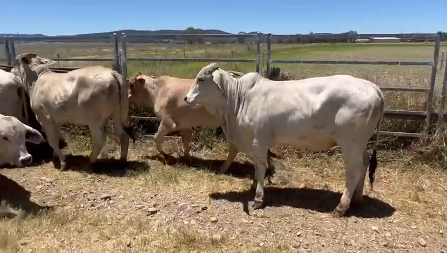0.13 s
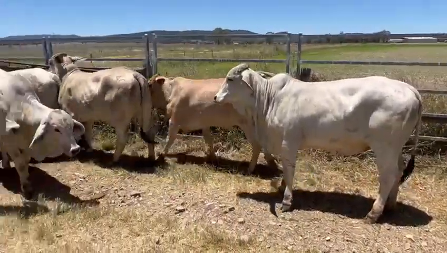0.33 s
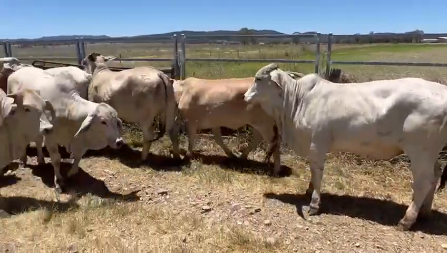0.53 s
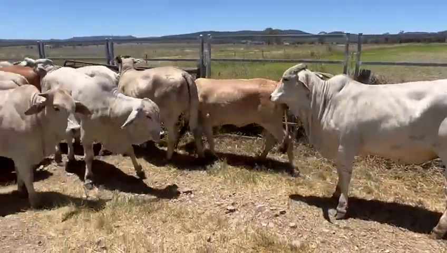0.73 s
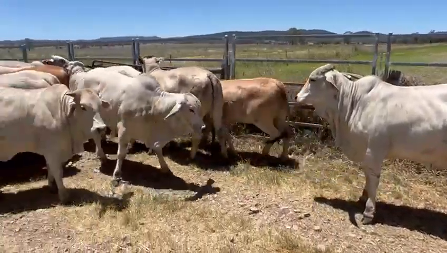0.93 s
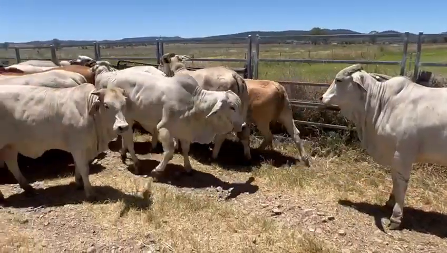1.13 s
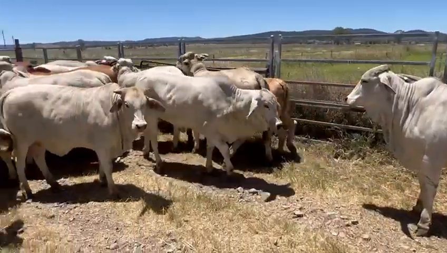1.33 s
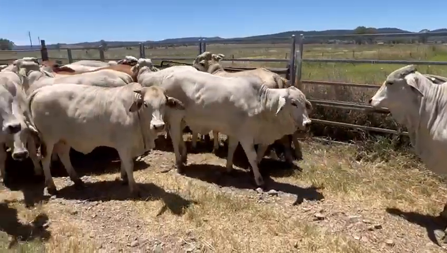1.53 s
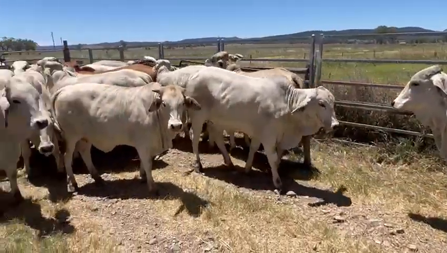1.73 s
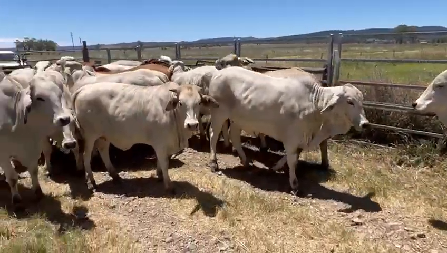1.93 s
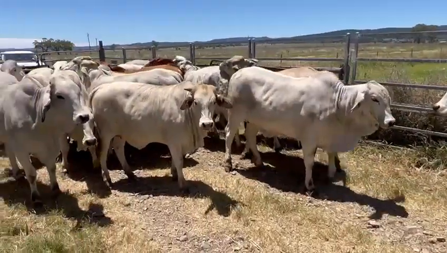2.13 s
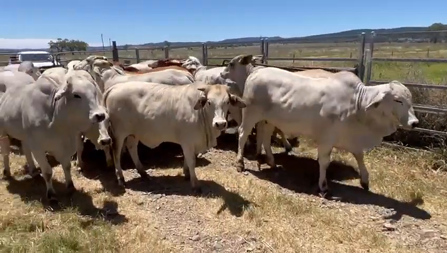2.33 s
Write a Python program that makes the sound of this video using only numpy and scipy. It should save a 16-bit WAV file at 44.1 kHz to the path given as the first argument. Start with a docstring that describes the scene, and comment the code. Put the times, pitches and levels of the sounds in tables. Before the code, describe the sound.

Hooves of a milling herd: heavy dull thuds and gritty scrapes under bassy microphone gusts, then clearer crunching, hollow stone knocks and dry straw rustle, outdoors with almost no reverberation and a faint open-air murmur.

```python
"""A dry dirt yard where cattle mill about. Hooves thud as short sagging tones, scuff as swells of grit grains,
knock on stones as ringing modes or dull narrow bursts, and snap dry stalks as narrow bursts of noise. Trampled
straw rustles faintly, then swells in the second half, as a dense crackle of tiny fractures over a faint open-
air murmur. Low thumps, most likely gusts on the microphone, are swells of bass noise: heavy at first, then
sinking to a soft rumble."""
import sys
import numpy as np
from scipy import signal
from scipy.io import wavfile
from scipy.ndimage import uniform_filter1d

SR = 44100
rng = np.random.default_rng(int(sys.argv[2]) if len(sys.argv) > 2 else 0)


def master(y):
    """Save y as 16-bit WAV."""
    cut = np.clip(np.atleast_2d(y).T, -1, 1)
    pcm = np.round(cut * 32767)  # scale
    wavfile.write(sys.argv[1], SR, pcm.astype(np.int16))


N = 109456
TIME = np.arange(N) / SR
EDGES = 22 * 2 ** (np.arange(24) * .4)  # band edges in Hz, 0.4 octave apart

# murmur of the far herd and fields: (frequency [Hz], density [dB per Hz])
FAR_COLOUR = [(40, -2), (250, -0.5), (900, -9), (4000, -17.5), (8000, -22)]
FAR_DB = -58.5

# left-right likeness of the ground sounds, then of the wind: (frequency [Hz], correlation [-1 to 1])
LIKENESS = [(130, 0.5), (270, 0.2), (600, 0.26), (900, -0.41), (1350, -0.65), (2100, -0.18), (2800, -0.83),
            (4000, 0.62), (9000, -0.71)]
WIND_LIKENESS = [(60, 0.55), (270, 0.25), (800, -0.47)]

# low thumps of moving air: (peak time [s], level [dB], half-length [s], tilt [dB per octave])
BUFFETS = [(0.037, -38, 0.024, 5.5), (0.053, -29, 0.009, -1), (0.09, -29.5, 0.016, 0),
           (0.155, -31, 0.0096, 3), (0.193, -30, 0.017, 1), (0.238, -39, 0.015, 5), (0.289, -27.5, .014, 1),
           (0.325, -28, 0.018, 1), (0.371, -33, .016, -7), (0.398, -33, .012, 1.5),
           (.458, -30.5, 0.024, 2.5), (0.478, -26.5, 0.011, 3), (0.501, -32, 0.013, 4),
           (0.531, -29.5, 0.0059, 3.5), (0.564, -26.5, 0.017, -1), (0.608, -34, 0.027, -1.5),
           (1.743, -45, .02, 0), (1.819, -42, 0.032, -0.5), (1.992, -48, 0.069, 4), (2.123, -44, 0.014, -5),
           (2.273, -42, 0.011, -6.5)]
# soft rumble under the thumps: (time [s], level [dB])
BREEZE = [(0, -35), (.125, -44), (.34, -40), (.6, -44), (.72, -40.5), (.82, -47.5), (1.05, -45),
          (1.28, -50.5), (1.39, -57), (1.52, -55), (1.57, -47.5), (1.66, -59), (1.8, -47.5), (2.22, -58),
          (2.48, -45.5)]
# colour of the thumps, then of the rumble: (frequency [Hz], density [dB per Hz])
BUFFET_COLOUR = [(25, -26), (45, 4), (70, 8.5), (115, -2), (170, -1.5), (300, -4.5), (480, -11),
                 (800, -30.5), (1500, -48), (3000, -54)]
BREEZE_COLOUR = [(25, -3.5), (45, -1.5), (70, 7), (115, -3), (300, -16), (1500, -30.5)]
WIND_PAN_DB = -0.2  # left against right, as in every pan
WIND_STEADY_S = 0.0285  # levelling window, lengthened by one cycle of each band

# trampled straw: (time [s], level [dB])
STRAW = [(0, -62), (.6, -66.5), (.8, -63), (1.18, -60), (1.28, -51), (1.37, -56.5), (1.45, -49.5),
         (1.69, -51.5), (1.75, -47.5), (1.82, -51), (2.12, -55.5), (2.2, -55), (2.48, -59)]
# colour of the straw: (frequency [Hz], density [dB per Hz])
STRAW_COLOUR = [(1500, -21), (2800, 13), (4200, 10.5), (6000, 14.5), (8500, 16), (10500, -31)]
STALKS_PER_S, STALK_SPREAD_DB = 4500, 0.2
STRAW_PAN_DB, STRAW_PATCHY_DB = 5.5, 3
LOOSE_STONES_DB = -12.5  # gain of stones nudged all over the yard, under the straw's level curve
CLUMP_DB, CLUMPS_PER_S = 2, 140  # grit and straw give way in short fits

# stalks snapping and hooves knocking on stones (the dull ones near 1 kHz): (time [s], level [dB], pitch [Hz])
CRACKS = [(0.186, -41, 6630), (.348, -42.5, 6560), (0.388, -44.5, 6670), (.474, -26, 977), (.528, -32, 960),
          (.553, -49.5, 7200), (0.625, -44.5, 5430), (.657, -35, 2190), (0.68, -46, 6000),
          (.681, -42, 1990), (.686, -42, 6540), (.698, -44, 2630), (0.854, -39, 5020), (1.069, -46, 7200),
          (1.083, -43.5, 7500), (1.231, -45, 3130), (1.276, -45.5, 5600), (1.424, -39, 6800),
          (1.450, -31.5, 2300), (1.455, -35, 2100), (1.465, -30, 3110), (1.714, -38, 7800),
          (1.715, -36, 2740), (1.729, -35.5, 8000), (1.883, -46, 6960), (1.973, -39.5, 7500),
          (1.995, -46.5, 3800), (2.045, -33, 930), (2.193, -43.5, 4220), (2.251, -54, 2800),
          (2.26, -46, 5070), (2.26, -42.5, 1800), (2.27, -43, 5500), (2.353, -51, 3730)]
CRACK_DECAY_S = 0.00078  # time to the peak, and the decay constant after it
CRACK_WIDTH_OCT, CRACK_SKIRT_DB = 0.22, -11.5  # reach to each side of the pitch; wider noise around it
CRACK_TAIL_S, CRACK_TAIL_DB, TAIL_CLICKS_PER_S = 0.022, -14.5, 600
CRACK_PAN_DB_PER_OCT, CRACK_CENTRE_HZ = 0.5, 2090  # bright stalks to the left, dull stones to the right

# hooves dragged through grit: (peak time [s], level [dB], fall [s], tilt [dB per octave])
SCUFFS = [(.08, -53, 0.025, 1), (.227, -46, 0.023, 0), (.30, -46, .035, -1), (.384, -54.5, 0.0096, 8.5),
          (.497, -44, 0.0084, -1.5), (.558, -48, .011, -0.5), (0.689, -46, 0.024, 0.5),
          (0.855, -45.5, 0.011, 0.5), (.919, -50, 0.039, 1), (1.079, -46, 0.024, -1),
          (1.115, -46, 0.018, -3.5), (1.228, -47.5, 0.035, 0), (1.27, -42, 0.02, -2.5),
          (1.297, -49, 0.011, -6.5), (1.427, -42, 0.0047, 3), (1.454, -38.5, 0.0087, -0.5),
          (1.469, -42.5, 0.013, -3.5), (1.51, -49, 0.012, -2), (1.587, -44, 0.031, -2.5),
          (1.747, -41, 0.0049, -3.5), (1.86, -51.5, 0.11, -1), (1.97, -63.5, 0.059, -10),
          (2.05, -54, 0.057, -8.5), (2.194, -44, .016, -1), (2.27, -43, 0.0094, -1),
          (2.38, -55.5, 0.13, -2.5)]
# colour of the grit: (frequency [Hz], density [dB per Hz])
GRIT_COLOUR = [(150, -7), (400, -10), (750, 3), (1250, 4), (1600, 1.5), (2100, 2), (3000, -5.5), (4200, -9),
               (6000, -7), (9000, -23), (10500, -48)]
SCUFF_RISE_SHARE = 1.21  # rise time against the fall
GRIT_PER_S, GRIT_SPREAD_DB = 2500, 0.5
GRIT_PAN_DB, GRIT_PATCHY_DB = -0.5, 4.5
PEBBLES_PER_S, PEBBLE_SPREAD_DB = 900, 9
PEBBLE_DB, PEBBLE_CYCLES = -10.5, 14  # gain inside a scuff; cycles to fall by 60 dB
PEBBLE_LOW_HZ, PEBBLE_HIGH_HZ = 694, 3600

# hooves clacking on loose stones: (time [s], level [dB], tilt [dB per octave])
KNOCKS = [(1.077, -36.5, -4), (1.212, -37.5, 1), (1.231, -33, 2), (1.263, -34, -1), (1.288, -37, -16.5),
          (1.426, -31, 1.5), (1.446, -34, 6.5), (1.465, -29.5, 7), (1.556, -45.5, -17), (1.579, -36, -6),
          (1.588, -40, -3), (2.191, -40, 0)]
# ring of hoof on stone, before the small change of pitch per knock: (frequency [Hz], level [dB], t60 [s])
KNOCK_MODES = [(760, -3, 0.037), (1200, -2, 0.057), (2100, -6, 0.061), (3120, -8.5, 0.038)]
KNOCK_CHATTER_S, KNOCK_CHATTER_PER_S, KNOCK_CHATTER_DB = 0.01, 760, -12.5
KNOCK_PAN_DB, KNOCK_ALIKE = -1.5, -0.5  # pan; left-right correlation
KNOCK_PITCH_SPREAD = .012  # no two stones ring quite alike

# dull thuds on packed earth: (start [s], peak level [dB], pitch at the peak [Hz], time to the peak [cycles])
THUDS = [(0.092, -16.5, 99, .35), (0.163, -29, 84, .6), (.288, -18.5, 114, 1.16), (0.484, -15.5, 116, 0.29),
         (.554, -28, 230, 1.54), (.712, -24, 125, 0.28), (.734, -27.5, 129, 0.25), (1.297, -39, 385, 1.84),
         (1.811, -32.5, 149, 0.62), (1.833, -32, 204, 0.61), (1.893, -30.5, 183, 1.23),
         (2.043, -33, 322, 0.92)]
THUD_SAG = 0.17  # final drop below the peak's pitch, as a share of it
THUD_SPREAD_RAD = 0.16  # phase shift of each ear, in opposite directions

ECHO_S, ECHO_DB = .00238, -19  # reflection from a surface just behind the microphone
RUSTLE_TOP_HZ, CUTOFF_HZ, BASS_CUT_HZ = 9900, 12200, 42.4


def from_db(db):
    """Decibels to gain."""
    return 10 ** (np.asarray(db) / 20)


def at_hz(points, hz):
    """Read a spectrum on a log-frequency axis."""
    f, value = np.transpose(points)
    return np.interp(np.log(hz), np.log(f), value)


def level_curve(rows):
    """Gain through time from rows of time and dB."""
    return from_db(np.interp(TIME, *np.transpose(rows)))


def rms_one(x):
    """Scale to rms 1."""
    return x / np.sqrt(np.mean(x ** 2) + 1e-20)


def band_pass(x, edges):
    """Keep the band between two edges in Hz."""
    return signal.sosfilt(signal.butter(2, edges, "band", fs=SR, output="sos"), x)


def pan(db):
    """Left and right gains for a level difference."""
    gains = from_db(np.array([[db], [-db]]) / 2)
    return rms_one(gains)


def stereo(pair, alike):
    """Mix two unrelated signals into left and right with a given correlation."""
    alike = np.clip(alike, -.95, .95)
    middle = np.sqrt(1 + alike) * pair[0]
    side = np.sqrt(1 - alike) * pair[1]
    return middle + side * np.array([[1], [-1]])


def add_at(out, s, sound):
    """Lay a short stereo sound into the mix at a time in seconds."""
    start = int(s * SR)
    out[:, start:start + sound.shape[1]] += sound


def bands(colour, likeness, source, steady_s=None):
    """Yield (Hz, stereo band) of a source; the colour only shares out one fixed total power."""
    centres = np.sqrt(EDGES[1:] * EDGES[:-1])
    inside = (EDGES[1:] > colour[0][0]) & (EDGES[:-1] < colour[-1][0])
    gains = from_db(at_hz(colour, centres)) * np.sqrt(np.diff(EDGES)) * inside
    gains = gains / np.linalg.norm(gains)
    for low, high, hz, gain in zip(EDGES, EDGES[1:], centres, gains):
        drive = source()
        if gain > 0:
            pair = band_pass(drive, [low, high])
            if steady_s:  # even out the random swells of the noise
                window = int((steady_s + 1 / hz) * SR)
                pair = pair / np.sqrt(uniform_filter1d(pair ** 2, window) + 1e-12)
            yield hz, gain * stereo(rms_one(pair), at_hz(likeness, hz))


def hiss():
    """Two unrelated white noises."""
    return rng.standard_normal((2, N))


def grains(per_s, spread_db):
    """A source of tiny fractures: shared moments and sizes, a new strength in every band."""
    moments = rng.random(N) < per_s / SR
    sizes = moments * from_db(spread_db * np.minimum(rng.exponential(1, N), 5))
    return lambda: sizes * hiss() + 1e-18


def drift(per_s):
    """Smooth random wander of rms 1, with a new target per_s times a second."""
    knots = rng.standard_normal(1000)
    return rms_one(np.interp(TIME * per_s, np.arange(len(knots)), knots))


def clumps():
    """Quick uneven gain of things giving way in fits; rms 1."""
    return rms_one(from_db(CLUMP_DB * drift(CLUMPS_PER_S)))


def patchy_bands(colour, source, patchy_db, per_s):
    """Yield ground-sound bands that each waver on their own."""
    for hz, band in bands(colour, LIKENESS, source):
        yield hz, band * rms_one(from_db(patchy_db * drift(per_s)))


def swells(db, tilt, hz, pivot_hz, power):
    """Gain through time of overlapping events, tilted for one band; their powers add."""
    return np.sqrt(from_db(db + tilt * np.log2(hz / pivot_hz)) ** 2 @ power)


def far_field():
    """Smooth murmur of the open country: steady coloured noise."""
    return from_db(FAR_DB) * sum(band for hz, band in bands(FAR_COLOUR, LIKENESS, hiss))


def wind(pivot_hz=120):
    """Short eddies thump on the microphone over a soft rumble."""
    s, db, length, tilt = np.transpose(BUFFETS)
    power = np.exp(-((TIME - s[:, None]) / length[:, None]) ** 2)
    thumps = sum(band * swells(db, tilt, hz, pivot_hz, power)
                 for hz, band in bands(BUFFET_COLOUR, WIND_LIKENESS, hiss, WIND_STEADY_S))
    rumble = sum(band for hz, band in bands(BREEZE_COLOUR, WIND_LIKENESS, hiss, WIND_STEADY_S))
    return thumps * pan(WIND_PAN_DB) + level_curve(BREEZE) * rumble * pan(db=-1.5)


def pebbles():
    """Small stones knock together, each ringing briefly at its own pitch; rms 1."""
    out, pitches = 0, np.geomspace(PEBBLE_LOW_HZ, PEBBLE_HIGH_HZ, 24)
    for hz in pitches * rng.uniform(.97, 1.03, len(pitches)):
        r = from_db(-60 * hz / (PEBBLE_CYCLES * SR))  # decay per sample
        w = 2 * np.pi * hz / SR
        hits = grains(PEBBLES_PER_S / len(pitches), PEBBLE_SPREAD_DB)()
        ring = signal.lfilter([1, 0, -1], [1, -2 * r * np.cos(w), r * r], hits)
        out = out + stereo(rms_one(ring), at_hz(LIKENESS, hz))
    return rms_one(out)


def straw():
    """Dry stalks crackle under the herd, to the left, and loose stones click among them."""
    stalks = grains(STALKS_PER_S, STALK_SPREAD_DB)
    crackle = sum(band for hz, band in patchy_bands(STRAW_COLOUR, stalks, STRAW_PATCHY_DB, per_s=60))
    stones = from_db(LOOSE_STONES_DB) * pebbles()
    return level_curve(STRAW) * (pan(STRAW_PAN_DB) * clumps() * crackle + stones)


def cracks():
    """A brittle burst at the pitch of the stalk or stone, with a short sparse tail of noise."""
    out, age = np.zeros((2, N + SR)), TIME[:SR // 10]
    snap = age / CRACK_DECAY_S * np.exp(1 - age / CRACK_DECAY_S)
    tail = from_db(CRACK_TAIL_DB) * np.exp(-(age / CRACK_TAIL_S) ** 2)
    for s, db, hz in CRACKS:
        clicks = (rng.random(len(age)) < TAIL_CLICKS_PER_S / SR) * np.sqrt(SR / TAIL_CLICKS_PER_S)
        drive = rng.choice([-1, 1], (2, len(age))) * (snap + tail * clicks)
        edges = np.minimum(hz * 2 ** (CRACK_WIDTH_OCT * np.array([-1, 1])), [SR * .4, SR * .45])
        body = rms_one(band_pass(drive, edges))
        skirt = rms_one(band_pass(drive, [hz / 2, min(hz * 2.05, CUTOFF_HZ)]))
        pair = rms_one(body + from_db(CRACK_SKIRT_DB) * skirt)
        pair = pair * np.sqrt(np.mean(drive ** 2))  # as strong as the burst that drives it
        place = pan(CRACK_PAN_DB_PER_OCT * np.log2(hz / CRACK_CENTRE_HZ))
        add_at(out, s, from_db(db) * place * stereo(pair, at_hz(LIKENESS, hz)))
    return out[:, :N]


def scuffs(pivot_hz=1800):
    """Each hoof crushes a swell of grit and pebbles that dies away as the weight settles."""
    s, db, fall, tilt = np.transpose(SCUFFS)
    rise = SCUFF_RISE_SHARE * fall
    age = TIME - s[:, None]
    power = np.exp(-np.where(age < 0, (age / rise[:, None]) ** 2, age / fall[:, None]))
    crushed = grains(GRIT_PER_S, GRIT_SPREAD_DB)
    grit = sum(band * swells(db, tilt, hz, pivot_hz, power)
               for hz, band in patchy_bands(GRIT_COLOUR, crushed, GRIT_PATCHY_DB, per_s=45))
    stones = pebbles() * np.sqrt(from_db(db + PEBBLE_DB) ** 2 @ power)
    return pan(GRIT_PAN_DB) * (grit * clumps() + stones)


def knocks():
    """A hoof strikes a stone, chatters on it for a moment and rings with a short hollow clack."""
    out, age = np.zeros((2, N + SR)), TIME[:SR // 10]
    chatter = from_db(KNOCK_CHATTER_DB) * np.exp(-age / KNOCK_CHATTER_S)
    for s, db, tilt in KNOCKS:
        pitch = 1 + KNOCK_PITCH_SPREAD * rng.standard_normal()
        contacts = (rng.random(len(age)) < KNOCK_CHATTER_PER_S / SR) * chatter
        for hz, mode_db, t60 in KNOCK_MODES:
            drive = contacts * rng.standard_normal((2, len(age))) + (age == 0)  # chatter and first strike
            phase = rng.uniform(0, 2 * np.pi) + np.array([[0], [np.pi / 2]])
            decay = np.exp(-np.log(1000) * age / t60)
            ring = np.sin(2 * np.pi * hz * pitch * age + phase) * decay
            pair = signal.fftconvolve(drive, ring, axes=1)[:, :len(age)] / np.sqrt(2)
            level = from_db(db + mode_db + tilt * np.log2(hz / KNOCK_MODES[1][0]))
            add_at(out, s, level * stereo(pair, KNOCK_ALIKE))
    return pan(KNOCK_PAN_DB) * out[:, :N]


def thuds():
    """The earth gives under a hoof: a few cycles that swell, sag in pitch and die."""
    out, age = np.zeros((2, N + SR)), TIME[:SR // 5]
    for s, db, hz, cycles in THUDS:
        swell = age * hz / cycles  # reaches 1 at the peak
        sagging_hz = hz * (1 - THUD_SAG * np.tanh(swell / 2 - .5))
        phase = 2 * np.pi * np.cumsum(sagging_hz) / SR
        ears = rng.uniform(0, 2 * np.pi) + THUD_SPREAD_RAD * np.array([[1], [-1]])
        add_at(out, s, from_db(db) * swell * np.exp(1 - swell) * np.sin(phase + ears))
    return out[:, :N]


def near_echo(x):
    """One quick reflection gives the ground sounds a hollow colour."""
    late = np.array([np.interp(TIME - ECHO_S, TIME, side, left=0) for side in x])
    return x + from_db(ECHO_DB) * late


def scene():
    """Hooves, straw and wind in the open air; rustle and clacks are low-passed, cracks left brighter."""
    top = signal.ellip(8, .5, 50, RUSTLE_TOP_HZ, fs=SR, output="sos")
    rustle = signal.sosfilt(top, far_field() + straw() + scuffs())
    clacks = signal.sosfilt(top, knocks())
    return wind() + near_echo(rustle + cracks()) + clacks + thuds()


def record(dry):
    """The microphone sheds the deepest bass; the top is cut steeply."""
    dry = signal.sosfilt(signal.butter(2, BASS_CUT_HZ, "high", fs=SR, output="sos"), dry)
    return signal.sosfilt(signal.cheby2(12, 70, CUTOFF_HZ * 1.1, fs=SR, output="sos"), dry)


dry = scene()
out = record(dry)
master(out)
```